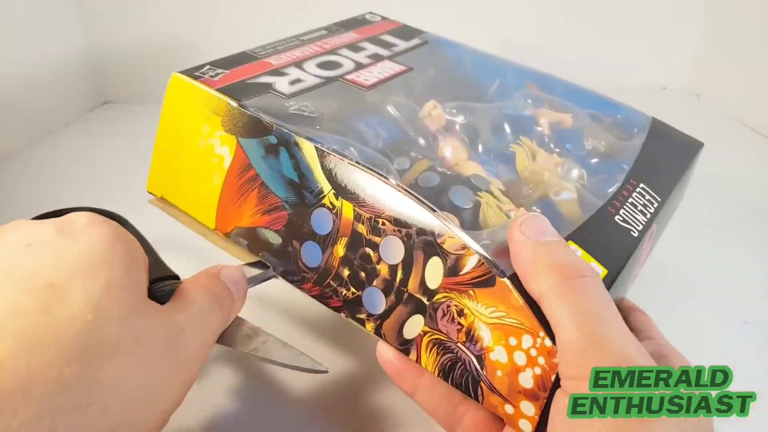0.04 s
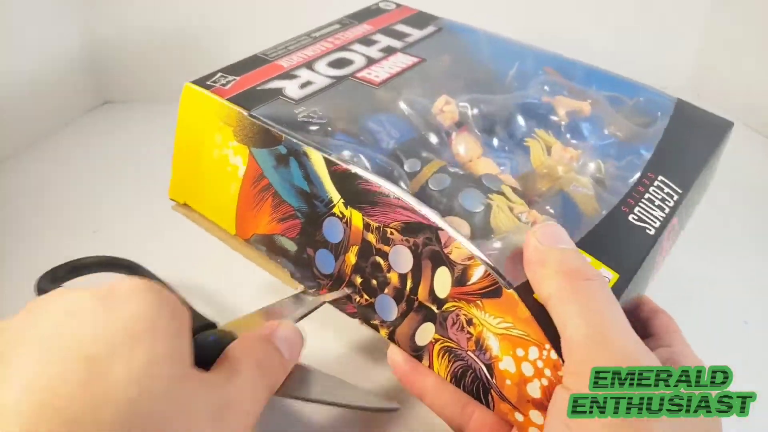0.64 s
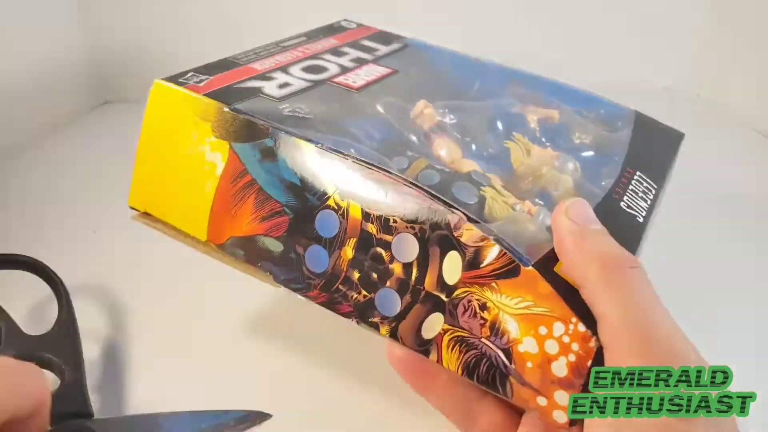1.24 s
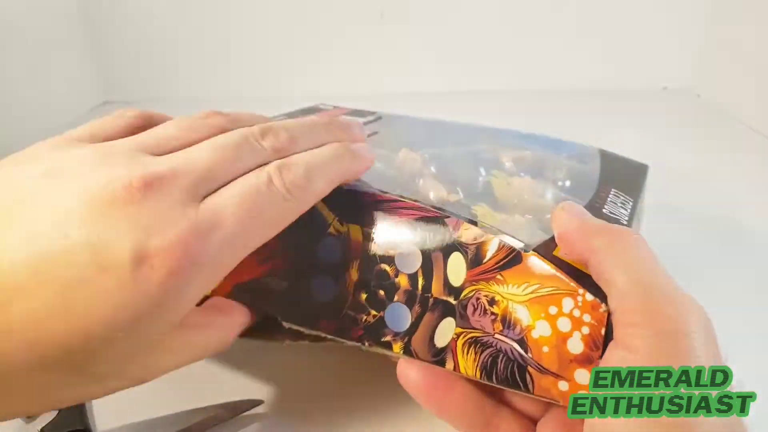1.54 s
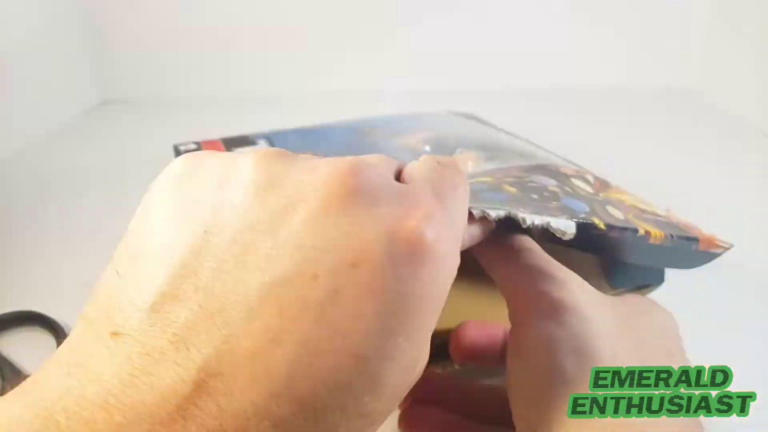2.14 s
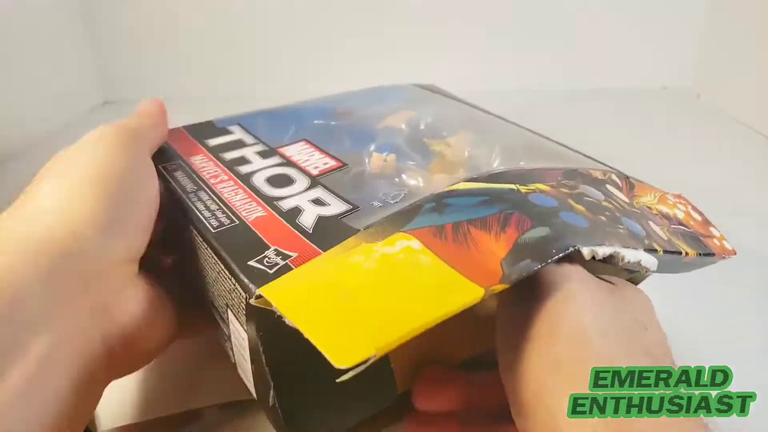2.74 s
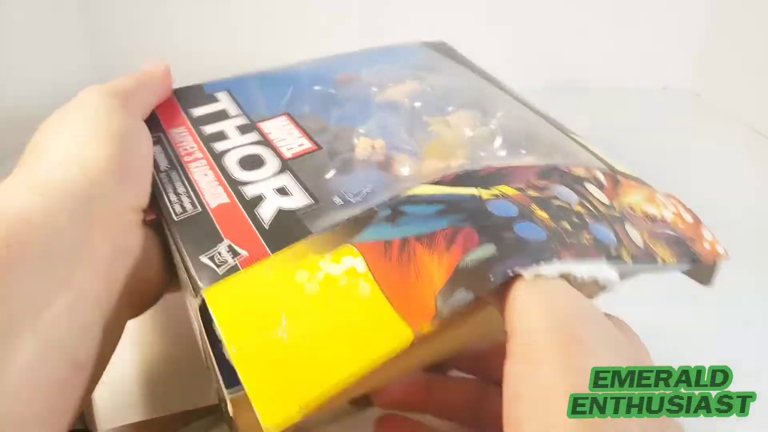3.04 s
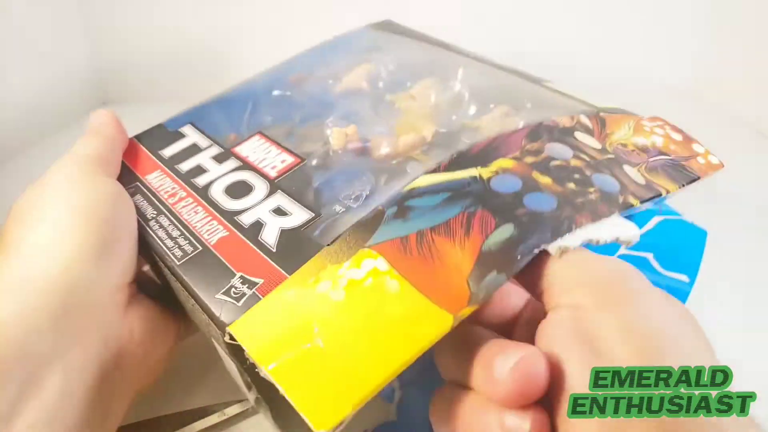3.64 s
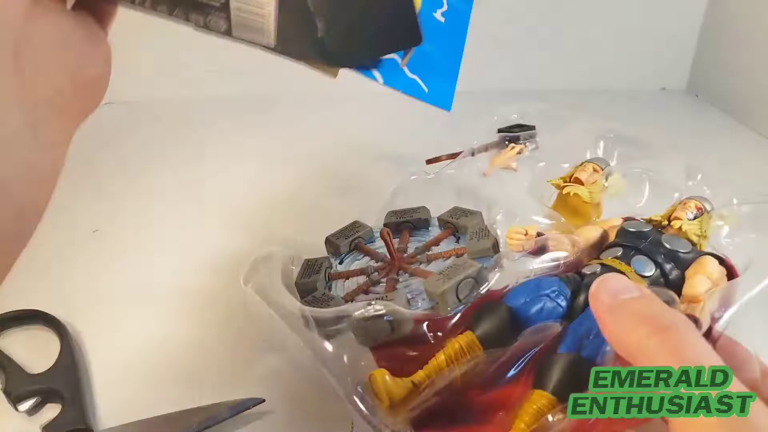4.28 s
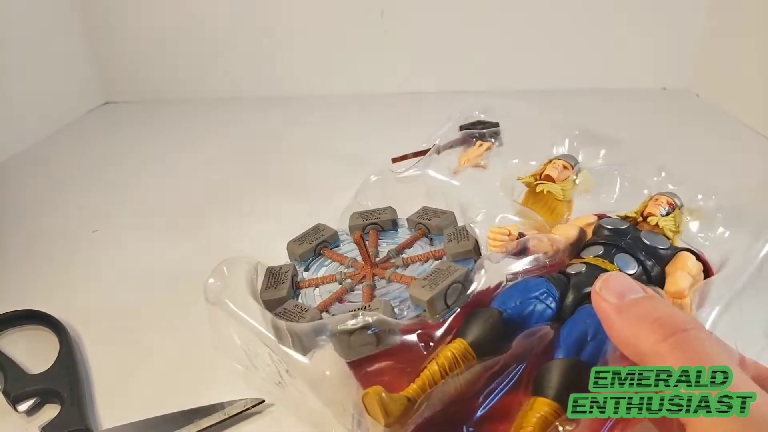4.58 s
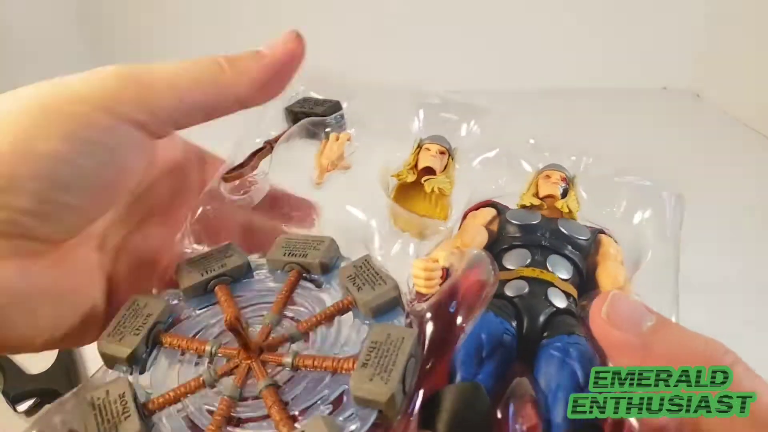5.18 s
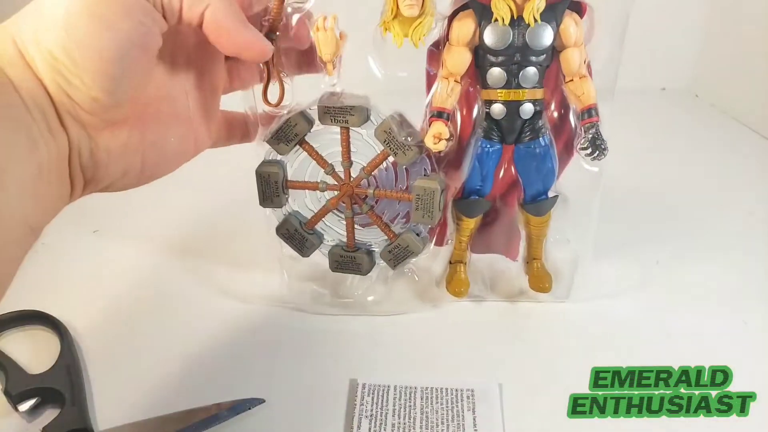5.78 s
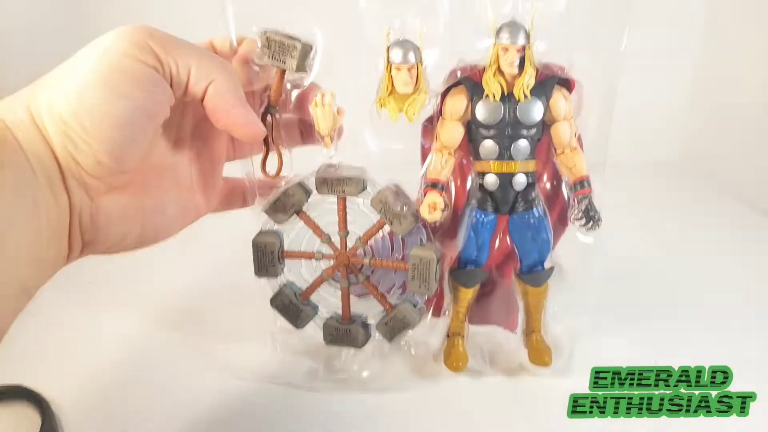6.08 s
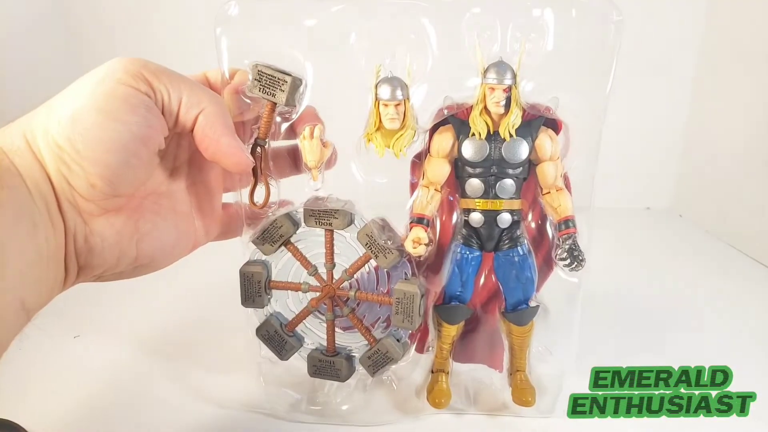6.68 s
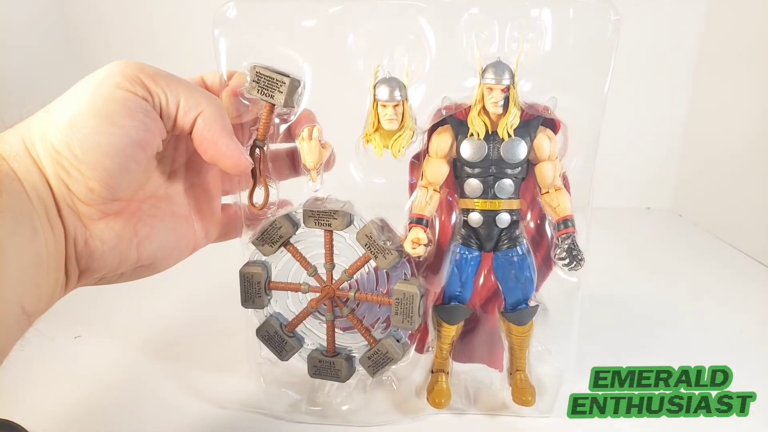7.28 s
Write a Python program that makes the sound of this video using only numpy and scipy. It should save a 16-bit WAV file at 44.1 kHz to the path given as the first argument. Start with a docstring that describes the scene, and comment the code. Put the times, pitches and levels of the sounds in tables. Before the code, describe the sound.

Scissors saw through tape on a cardboard box, the flap is pulled open, and a thin plastic tray scrapes out and crinkles.

```python
"""Unboxing on a table

Close to a stereo microphone in a small room, a scissor blade saws through the tape of a cardboard box
and breaks free. The flap is pulled open, hands rub and knock the card, and a thin plastic tray scrapes
out, is set down, crinkles as it is lifted and gives a last few pops. Stick-slip friction and sudden
releases supply the forces; the resonances of card and plastic colour the sound."""
import sys
import numpy as np
from scipy import signal
from scipy.fft import rfft, irfft
from scipy.io import wavfile
from scipy.ndimage import uniform_filter1d

SR = 44100
rng = np.random.default_rng(int(sys.argv[2]) if len(sys.argv) > 2 else 0)


def wav_record(signal):
    """Record a signal, one row per channel, as 16-bit PCM in the file named by sys.argv[1]."""
    frames = np.transpose(np.atleast_2d(signal))
    bounded = np.clip(frames, -1, 1)
    # unit amplitude maps onto the largest positive 16-bit level
    quanta = np.round(bounded * 32767).astype(np.int16)
    wavfile.write(sys.argv[1], SR, quanta)


N = 327118

# Centres in Hz of four frequency zones. A timbre gives the energy per Hz in each, in dB.
ZONE_CENTRES_HZ = (250, 1000, 4000, 13000)
# Resonances of the box under the blade, the handled box and the tray.
# Each row: frequency in Hz, width in Hz, lift in dB (negative where the sheet radiates poorly).
CUT_RESONANCES = [(80, 140, -2.5), (225.5, 53, 10.5), (385, 130, 7), (634, 150, 6), (916.5, 240, 7.5),
                  (2252, 300, 3), (3300, 370, -3.5), (6700, 900, 1.5), (15000, 270, 7.5)]
BOX_RESONANCES = [(85, 340, -4.5), (234, 60, 4), (319.4, 31, 6), (472, 54, 5), (657, 150, 3.5),
                  (926.7, 120, 4.5), (1220, 150, 6.5), (1540, 150, -3.5), (1850, 280, 1.5),
                  (3063, 150, -1.5), (14300, 270, 3)]
TRAY_RESONANCES = [(302.7, 110, 6), (504.6, 75, 1), (637, 120, 10), (842, 140, 4), (1340, 230, 2),
                   (1770, 250, 2.5), (4480, 620, 2.5)]


def blade_sawing():
    """Stick-slip friction of the blade in the tape drives the resonances of the box."""
    # Each row: middle in seconds, half width in seconds, level in dB, brightness in dB per octave.
    cuts = [(.106, .007, -15, 1.5), (.1665, .012, -18, -2), (.245, .01, -6.5, -2), (.3096, .0095, -5, -2),
            (.3954, .012, -1.1, -0.5), (.4778, .008, 1, .4), (.5454, .009, -2.5, 0.5),
            (.6195, .008, -5, -0.2), (.779, .009, -1, -0.7), (.829, .011, 2, 0.3), (.9416, .01, -6, -0.5),
            (.962, .006, 3.5, 5.5), (.991, .017, -0.5, 1.2), (1.081, .006, -1.5, 2.5),
            (1.103, .008, -7.5, 0.4), (1.1755, .0056, -3, 2.5), (1.2436, .005, 5.5, 0.1),
            (1.313, .017, 1.5, 2.6)]
    return strokes(cuts, CUT_RESONANCES, timbre=(10.5, -0.5, -6, -11),
                   slips_per_s=4000, scatter_db=1.5, direct=1.3, flutter_s=0.0013)


def tape_snaps():
    """Fracture: tape under tension gives way and jolts the box."""
    # Each row: start and decay time in seconds, level in dB, brightness in dB per octave, heft in dB.
    breaks = [(1.092, .006, 0.6, -6, -10), (1.156, .0148, -11, 6.5, 6), (1.227, .018, 0.5, 2.7, 12),
              (1.2325, 0.0094, 12.5, -2.7, -5.5), (1.2615, .0055, 4, 3.5, -2), (1.28, .002, -6.5, 0.5, -12),
              (1.34, 0.0032, -15, 6, -1), (1.373, 0.0048, -22.5, 4.5, 17)]
    return snaps(breaks, CUT_RESONANCES, timbre=(-5.5, -5.5, -0.5, 0.5),
                 slips_per_s=2200, scatter_db=3.5, crack=0.17, flutter_s=0.0015)


def card_rubs():
    """Sliding friction of card on card and on the tray shakes the panels."""
    # Each row: middle in seconds, half width in seconds, level in dB, brightness in dB per octave.
    rubs = [(1.568, .004, -12.5, 0.8), (1.622, 0.012, -2.5, 1.5), (1.639, 0.0021, -6, -5),
            (1.658, 0.0083, -4.5, -1.2), (1.798, 0.0042, -11, -1), (1.94, .013, -10, 1.5),
            (2.162, 0.012, -4.5, 1.5), (2.243, 0.0063, -11, .8), (2.551, 0.0067, -8, -1),
            (2.78, 0.013, 1, -1.16), (2.858, 0.0091, .3, 1), (2.982, 0.023, -2.5, -1),
            (3.004, 0.0069, 8, 1.5), (3.032, 0.0054, 15.5, 0), (3.218, .013, -3, -1),
            (3.291, .012, 4, 0.56), (3.348, 0.0088, -7.5, -1.5), (3.606, 0.0096, -0.5, -0.55),
            (3.65, 0.0064, 0.5, 2.6), (3.698, 0.0082, 6, -1), (3.792, 0.0052, -2, 1.3),
            (3.817, 0.0079, 5, 0), (3.88, 0.016, 9, 0.8), (3.978, 0.015, 3.5, 2.5), (4, 0.017, 5, 1.5),
            (4.049, 0.005, 8.5, -1.5)]
    return strokes(rubs, BOX_RESONANCES, timbre=(7.5, 2, -8, -15.5),
                   slips_per_s=1500, scatter_db=0.5, direct=1.5, flutter_s=0.0023)


def box_knocks():
    """Impacts of flaps and fingers excite the damped resonances of the box."""
    # Each row: start and decay time in seconds, level in dB, brightness in dB per octave, heft in dB.
    knocks = [(1.438, 0.023, -11.5, 1.5, 9.5), (1.492, 0.0076, -12, -5.5, -5), (1.626, 0.01, 0, 3, 7),
              (1.8885, 0.0062, 5.5, -2, -4), (2.128, 0.003, -12.5, 1, 8.5), (2.3455, 0.0049, 6, 2, -1.5),
              (2.413, 0.0083, 1, -3, 1), (2.461, 0.014, -5, -0.5, 13), (2.4835, 0.0025, 2.5, 2.5, -1),
              (2.603, 0.021, -9, -3.5, 9), (2.733, .0066, -3.4, -4, -5), (2.881, 0.0037, 7.5, 1, -16),
              (3.022, 0.0024, 4.5, 8, -12), (3.0255, 0.003, 13, 0.5, 1), (3.0835, 0.0035, -3.5, 0.5, -3),
              (3.133, 0.014, -17.5, 6, -19), (3.458, .023, -4, -4.5, 13.5), (3.503, 0.014, -7, -2, 18),
              (3.86, 0.0082, 6.5, -1.5, -17), (3.8775, 0.0032, 14.5, -0.5, 1),
              (3.93, 0.0061, -0.5, -1, -20), (4.023, 0.0073, 7, 1, -8), (4.0415, .0065, 13, 0.2, 0),
              (4.075, .0022, -11, 1, -10)]
    return snaps(knocks, BOX_RESONANCES, timbre=(1, 2.5, -7.5, -16),
                 slips_per_s=3500, scatter_db=1.0, crack=0.18, flutter_s=0.0022)


def tray_crinkles():
    """The flexing tray sheds elastic energy in swarms of tiny clicks."""
    # Each row: middle in seconds, half width in seconds, level in dB, brightness in dB per octave.
    flexes = [(4.19, 0.0091, -20, -1.7), (4.34, 0.013, -26.5, -2), (4.48, 0.023, -31.5, 2),
              (4.6035, 0.01, -13.5, 0.7), (4.765, 0.0085, -31.5, -9.5), (4.909, 0.009, 6, -1.5),
              (5.02, .01, -8, -2.5), (5.168, 0.0059, -2, 1.5), (5.232, 0.012, 3, 1.5),
              (5.272, 0.0059, 7.5, 0), (5.401, .017, 14.5, 0.6), (5.432, 0.024, 4, 1),
              (5.527, 0.022, 4, -1), (5.551, 0.0029, 2, -2.5), (5.649, .028, -11.5, -1.5),
              (6.518, 0.014, -11, -2.3), (6.57, 0.0093, -24.5, -2)]
    return strokes(flexes, TRAY_RESONANCES, timbre=(0, -1, -9.5, -16),
                   slips_per_s=800, scatter_db=3, direct=1.0, flutter_s=0.0029)


def tray_pops():
    """Buckling: the thin plastic jumps to a new shape and rings briefly."""
    # Each row: start and decay time in seconds, level in dB, brightness in dB per octave, heft in dB.
    buckles = [(4.553, .007, -21.5, 4, 18), (5.05, 0.008, -10, -3.5, 17), (5.11, 0.0022, -7, -3, -12),
               (5.148, 0.0094, -4, 0, 7), (5.1735, 0.0098, 9.5, 2.4, -4), (5.202, .005, 9, 3.5, -13),
               (5.2645, 0.00093, -9, -14, 19), (5.311, .0015, -13, -5, 1), (5.364, 0.0021, 13, 2, -25),
               (5.3815, 0.0012, 13, 1, -32), (5.392, 0.0096, 13, 1.7, 11), (5.442, 0.0024, 6.5, 2, -23),
               (5.494, 0.0065, -0.5, 1, 16), (5.693, 0.0025, -3.5, 1.8, 5.5), (5.735, 0.0085, -5, -2.5, -5),
               (5.948, 0.0047, -31, 5.5, 15), (6.1, 0.0032, -34.5, 2, 23.5), (6.498, 0.025, -3, -5, -1),
               (7.353, .0076, -24, -6, 3.5), (7.409, 0.0093, -30, -6, 8)]
    return snaps(buckles, TRAY_RESONANCES, timbre=(-11, 0, -13, -19.5),
                 slips_per_s=910, scatter_db=0.5, crack=0.68, flutter_s=0.0035)


def strokes(events, resonances, timbre, slips_per_s, scatter_db, direct, flutter_s, size=12288):
    """Friction from many spots swells and fades as a blade, finger or tray edge moves."""
    out, t = np.zeros((2, N)), (np.arange(size) - size // 2) / SR
    for middle, width, db, brightness in events:
        mid, side = (slips(size, slips_per_s, scatter_db) for _ in range(2))
        force = spread(mid, side, left_db=2.5) / np.cosh(t / width)
        zone_db = zone_levels(timbre, db, brightness)
        add(out, middle + t[0], sheet_response(force, zone_db, resonances, flutter_s, direct))
    return out


def snaps(events, resonances, timbre, slips_per_s, scatter_db, crack, flutter_s, size=8192):
    """Stress relaxes in one sharp impulse and a dying train of smaller ones."""
    out, t = np.zeros((2, N)), np.arange(size) / SR
    for start, decay, db, brightness, heft_db in events:
        force = slips(size, slips_per_s, scatter_db) * np.exp(-t / decay)
        force[0] += crack * np.sqrt(SR * decay / 2)
        zone_db = zone_levels(timbre, db, brightness)
        zone_db[0] = timbre[0] + db + heft_db  # the more of the pack moves, the more boom
        add(out, start, sheet_response(force, zone_db, resonances, min(flutter_s, decay), direct=0.36))
    return out


def slips(size, per_s, scatter_db):
    """Stick-slip: tiny releases at random moments and of uneven strength, scaled to unit rms."""
    strength = undb(scatter_db * np.minimum(rng.exponential(size=size), 4))
    released = rng.random(size) < per_s / SR
    impulses = released * strength * np.sign(rng.standard_normal(size))
    return impulses / np.std(impulses)


def zone_levels(timbre, db, brightness, pivot_hz=2000):
    """Spectral tilt about a pivot: hard, fast contacts are bright."""
    return np.array(timbre) + db + brightness * np.log2(np.array(ZONE_CENTRES_HZ) / pivot_hz)


def sheet_response(force, zone_db, resonances, flutter_s, direct, size=8192):
    """Forced vibration of a sheet: direct and briefly scattered waves pass through its resonances."""
    t, hz = np.arange(size) / SR, np.fft.rfftfreq(2 * size, 1 / SR)
    waves = spread(*rng.standard_normal((2, size)) * np.exp(-t / flutter_s))
    waves[:, 0] += direct * np.sqrt(SR * flutter_s / 2)
    spectrum = rfft(force, 2 * size) * rfft(waves, 2 * size)
    grip_shift = 1 + 0.02 * rng.standard_normal()
    lift_db = sum(db / (1 + (2 * (hz - f * grip_shift) / width) ** 2) for f, width, db in resonances)
    # each zone is brought to the strength of this contact
    power = np.mean(np.abs(spectrum) ** 2, axis=0) * undb(lift_db) ** 2
    gains = [(f, db - 10 * np.log10(power[(hz > f / 2) & (hz < f * 2)].mean()))
             for f, db in zip(ZONE_CENTRES_HZ, zone_db)]
    return irfft(spectrum * minimum_phase(lift_db + on_log_axis(hz, gains)))


def panel_thumps(gain_db=1, waver=0.064):
    """Damped oscillation: a softly pushed panel swings up and dies away, its pitch unsteady in the grip."""
    # Each row: start in seconds, frequency in Hz, level in dB, nominal 60 dB decay time in seconds.
    blows = [(0.102, 217, -39, 0.045), (0.238, 484, -31, 0.04), (1.232, 361, -25, 0.055),
             (1.244, 127, -36, 0.1), (1.17, 488, -38, 0.031), (1.298, 378.4, -36.5, 0.083),
             (1.26, 222.3, -36.5, 0.14), (1.892, 251, -15.5, 0.017), (3.026, 1180, -19, 0.023),
             (3.084, 1090, -32, 0.015), (3.878, 1483, -21, 0.024), (4.043, 231, -31.5, 0.042),
             (4.045, 981, -24.5, 0.027), (4.756, 158, -45.5, 0.03), (4.887, 118, -23, 0.047),
             (4.9, 392, -27.5, 0.028), (5.008, 127.3, -41.5, 0.074), (6.1, 189, -56.5, 0.053),
             (6.355, 192, -60, 0.056), (6.502, 881, -40.5, 0.082)]
    out, t = np.zeros((2, N)), np.arange(SR // 3) / SR
    for start, hz, db, t60 in blows:
        age = t * np.log(1000) / t60
        grip = uniform_filter1d(rng.standard_normal(len(t)), size=200)
        phase = 2 * np.pi * np.cumsum(hz * (1 + waver * grip / grip.std())) / SR
        add(out, start, undb(db + gain_db) * age * np.exp(1 - age) * np.sin(phase))
    return out


def squeaks():
    """Nearly periodic slips of the blade or tray rim give a band of noise around one rough pitch."""
    # Each row: middle and half width in seconds, centre and bandwidth in Hz, level in dB.
    chatters = [(.959, 0.0023, 794, 345.7, -30), (1.079, 0.0052, 3186, 399, -29),
                (1.084, .005, 5800, 1600, -28), (3.88, .0025, 3698, 2387, -16.5),
                (6.52, 0.0091, 1500, 447, -48.5), (4.046, .004, 1750, 900, -27.5)]
    out, t = np.zeros((2, N)), np.arange(-4096, 4096) / SR
    for middle, width, hz, width_hz, db in chatters:
        band = signal.butter(2, [hz - width_hz / 2, hz + width_hz / 2], "band", fs=SR)
        chatter = signal.lfilter(*band, spread(*rng.standard_normal((2, len(t)))))
        add(out, middle + t[0], undb(db) * chatter / chatter.std() / np.cosh(t / width))
    return out


def hands():
    """Sliding friction of the hands follows their effort through four moves."""
    # Each row: time in seconds, effort in dB.
    holding_box = [(0.0, -52), (0.11, -64.5), (0.418, -67.5), (0.568, -64.5), (0.77, -54), (1.162, -53),
                   (1.268, -58), (1.42, -65)]
    opening_box = [(1.42, -62), (1.59, -57), (2.17, -56), (2.54, -52.5), (2.78, -47), (2.92, -47.5),
                   (3.05, -45.5), (3.14, -55), (3.27, -46.5), (3.32, -61), (3.42, -52)]
    drawing_tray = [(3.42, -55), (3.462, -56.5), (3.548, -45.5), (3.86, -54.5), (3.924, -43), (4.064, -68),
                    (4.2, -77.5)]
    lifting_tray = [(4.9, -67), (5.072, -64), (5.378, -54), (5.49, -53), (5.58, -50), (5.608, -48),
                    (5.728, -83), (5.85, -86)]
    return (slide(holding_box, rub_db=8.5, grit_db=-8.5)
            + slide(opening_box, rub_db=12.5, grit_db=-1.5)
            + slide(drawing_tray, rub_db=13.5, grit_db=-5.5)
            + slide(lifting_tray, rub_db=6.5, grit_db=-4.5))


def slide(effort, rub_db, grit_db, uneven_db=3, ease_s=0.02):
    """Skin and card stick and slip in fits and starts: one effort drives a dull rub and a finer grit."""
    # Friction spectra. Each row: frequency in Hz, gain in dB.
    rub_spectrum = [(60, -9), (150, 0.5), (300, 1), (600, -4.5), (1300, -6.5), (2500, -24), (6000, -41.5)]
    grit_spectrum = [(500, -23.5), (1500, -3), (2500, 2), (6500, -2), (11000, -5), (16000, 0.5)]
    t = np.arange(N) / SR
    times, db = np.transpose(effort)
    fits = np.interp(t, np.linspace(0, N / SR, num=400), rng.standard_normal(size=400))
    rub = colour(spread(slips(N, 3000, 1.3), slips(N, 3000, 3)), rub_spectrum)
    grit = colour(spread(slips(N, 2500, 4.0), slips(N, 2500, 4.5)), grit_spectrum)
    moving = np.clip(np.minimum(t - times[0], times[-1] - t) / ease_s, 0, 1) ** 2  # at rest at both ends
    envelope = moving * undb(np.interp(t, times, db) + uneven_db * fits)
    return envelope * (rub * undb(rub_db) + grit * undb(grit_db))


def room(x, t60=0.17, wet_db=-19, delay_s=0.004):
    """Reverberation: the table and near walls return a short diffuse tail."""
    t = np.arange(SR // 2) / SR
    reflections = rng.standard_normal((2, len(t))) * undb(-60 * t / t60) * (t > delay_s)
    tail = spread(*reflections, apart_hz=300, left_db=-2.5)
    tail /= np.sqrt(np.sum(tail ** 2, axis=1, keepdims=True))
    return x + undb(wet_db) * signal.fftconvolve(x, tail, axes=1)[:, :N]


def background():
    """Stationary noise: the low rumble of the building under a faint hiss."""
    # Each row: frequency in Hz, gain on white noise in dB.
    rumble_spectrum = [(15, -50.5), (32, -39), (52, -22.5), (75, -42.5), (105, -45.5), (200, -57.5),
                       (320, -66.5), (700, -93.5), (3000, -110)]
    hiss_spectrum = [(100, -71), (600, -74), (1500, -78), (4500, -83.5), (6000, -85), (6800, -75.5),
                     (7600, -83.5), (8500, -80.5), (10500, -81), (13000, -76.5), (16000, -87)]
    rumble = colour(spread(*rng.standard_normal((2, N)), apart_hz=80, left_db=0), rumble_spectrum)
    return rumble + colour(rng.standard_normal((2, N)), hiss_spectrum)


def spread(mid, side, apart_hz=900, left_db=3.0):
    """Two microphone ports share long waves; short waves reach them differently."""
    bass = signal.lfilter(*signal.butter(1, apart_hz, fs=SR), mid)
    treble = mid - bass
    side = signal.lfilter(*signal.butter(2, apart_hz, "high", fs=SR), side)
    lean = undb(left_db / 2)
    return bass + np.array([(treble + side) * lean, (treble - side) / lean]) / np.sqrt(2)


def colour(x, points):
    """Convolution with a causal filter imposes a spectrum of (Hz, dB) points."""
    db = on_log_axis(np.fft.rfftfreq(8192, 1 / SR), points)
    return signal.fftconvolve(x, irfft(minimum_phase(db))[None], axes=1)[:, :N]


def minimum_phase(db):
    """Causality: this response to a dB curve rings after a blow, never before."""
    cepstrum = irfft(np.log(undb(db)))
    half = len(cepstrum) // 2
    cepstrum[1:half] *= 2
    cepstrum[half + 1:] = 0
    return np.exp(rfft(cepstrum))


def on_log_axis(hz, points):
    """Linear interpolation of (Hz, dB) points over log frequency."""
    f, db = np.transpose(points)
    return np.interp(np.log(np.maximum(hz, 1)), np.log(f), db)


def undb(db):
    """Decibels to amplitude ratio."""
    return 10 ** (np.asarray(db) / 20)


def add(out, start, sound):
    """Superpose a sound at a time in seconds."""
    i = int(start * SR)
    a, b = max(i, 0), min(i + sound.shape[-1], N)
    out[:, a:b] += sound[..., a - i:b - i]


def scene():
    """Superposition of scissors, box, tray and hands in one room."""
    contacts = blade_sawing() + tape_snaps() + card_rubs() + box_knocks() + tray_crinkles() + tray_pops()
    return room(contacts + hands() + squeaks() + panel_thumps()) + background()


def record(dry, ceiling=0.85, top_hz=16000):
    """The microphone filters and saturates: thin deep bass, a treble dip, rounded peaks, no extreme top."""
    # Each row: frequency in Hz, gain in dB.
    microphone_response = [(20, -10), (70, -1), (130, 0), (6800, 1.5), (8000, -7.5), (9000, -9),
                           (10200, -4.5), (15000, 0.5), (15800, -6.5)]
    rounded = ceiling * np.tanh(colour(dry, microphone_response) / ceiling)
    return signal.sosfilt(signal.ellip(10, 0.2, 70, top_hz, fs=SR, output="sos"), rounded)


dry = scene()
out = record(dry)
wav_record(out)
```